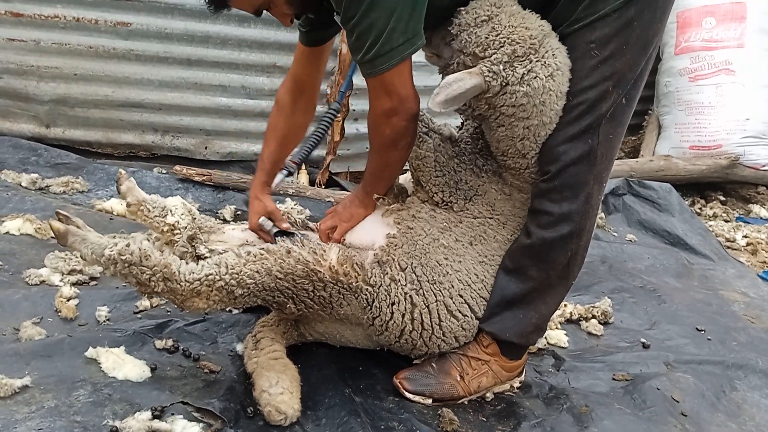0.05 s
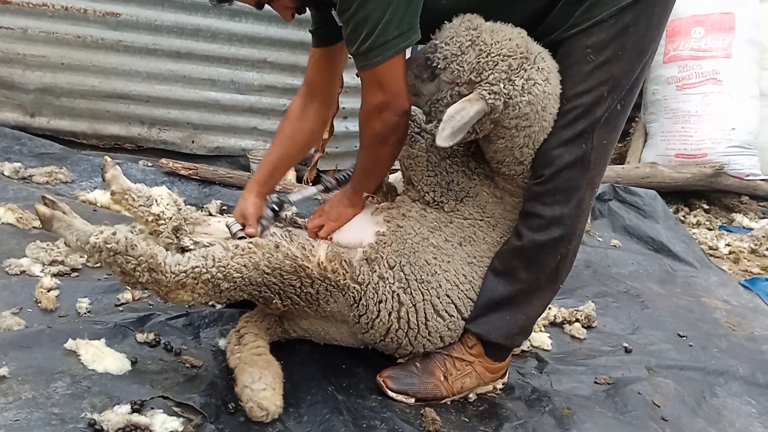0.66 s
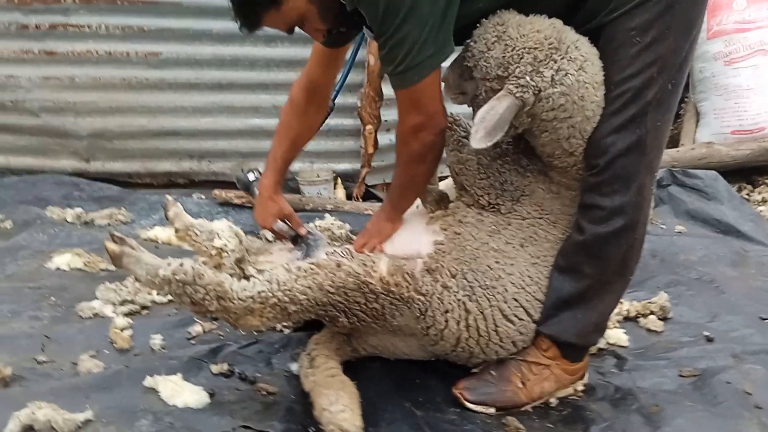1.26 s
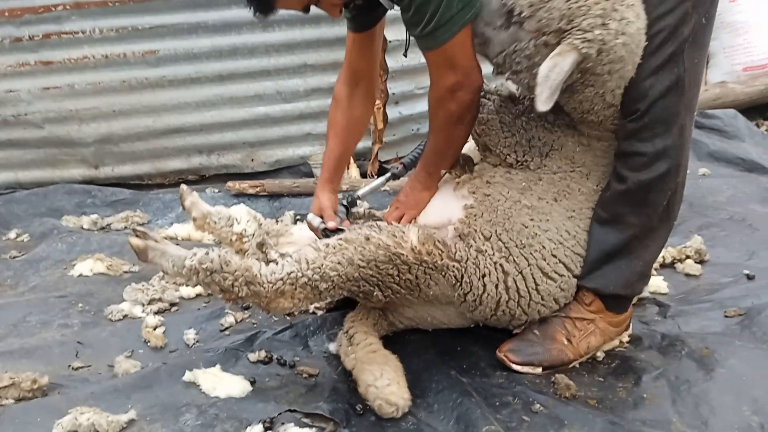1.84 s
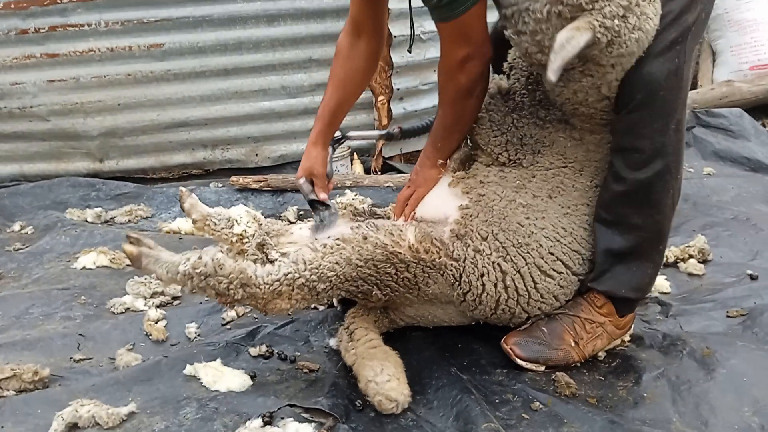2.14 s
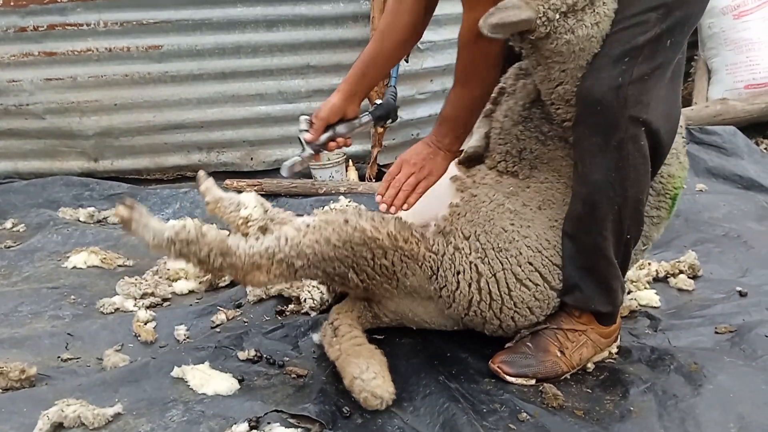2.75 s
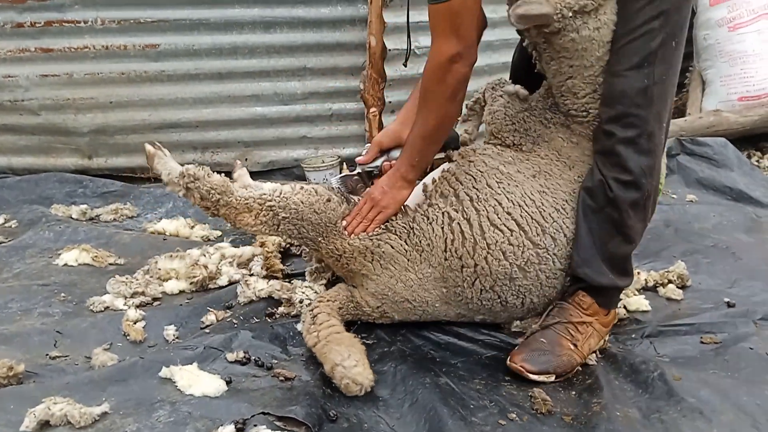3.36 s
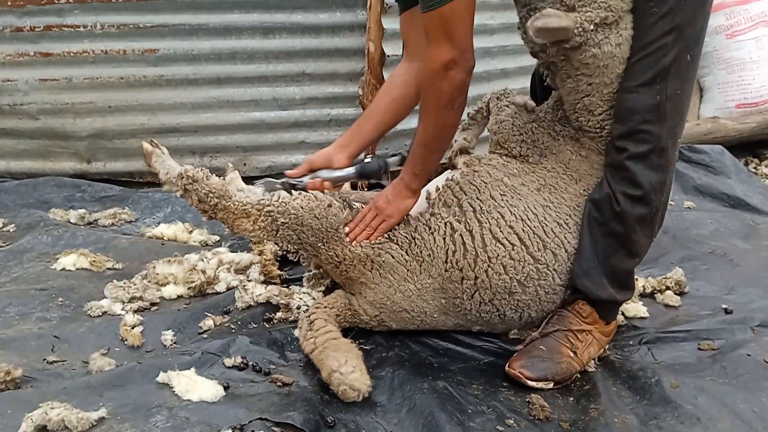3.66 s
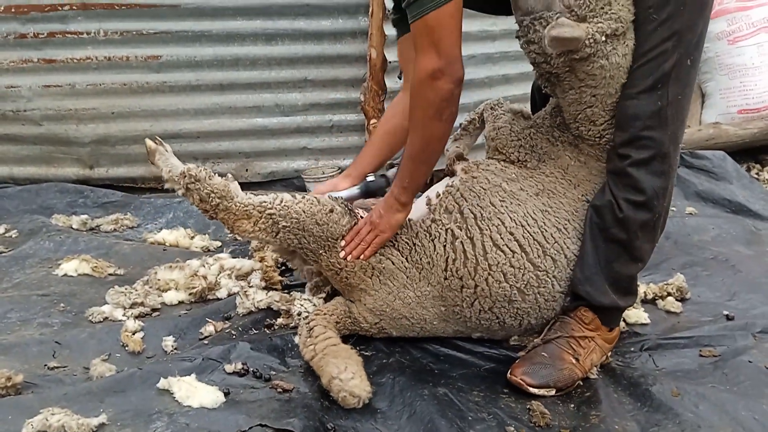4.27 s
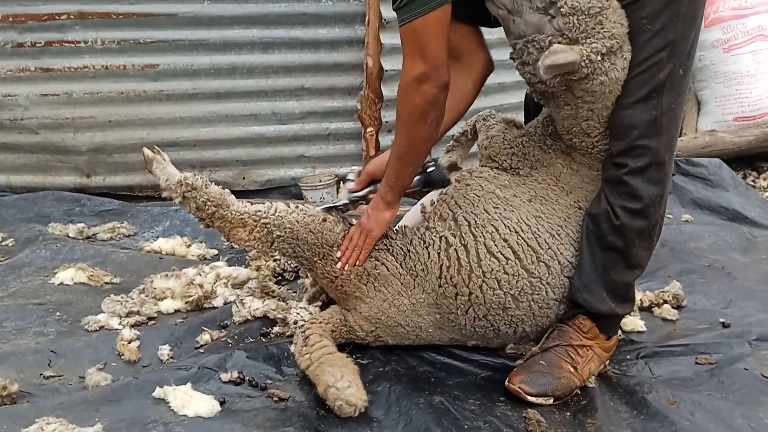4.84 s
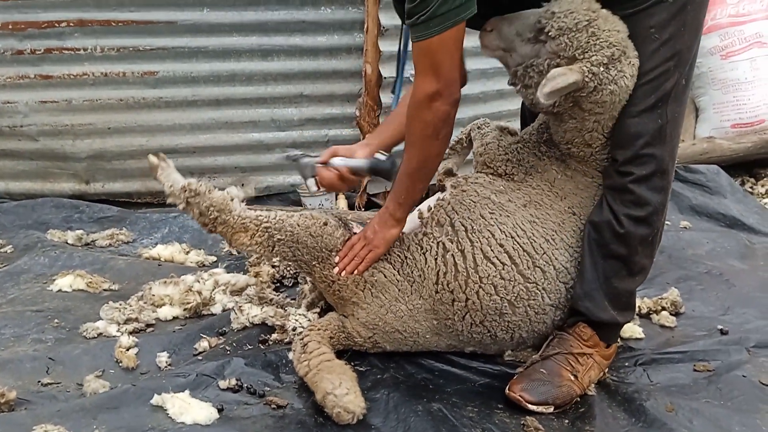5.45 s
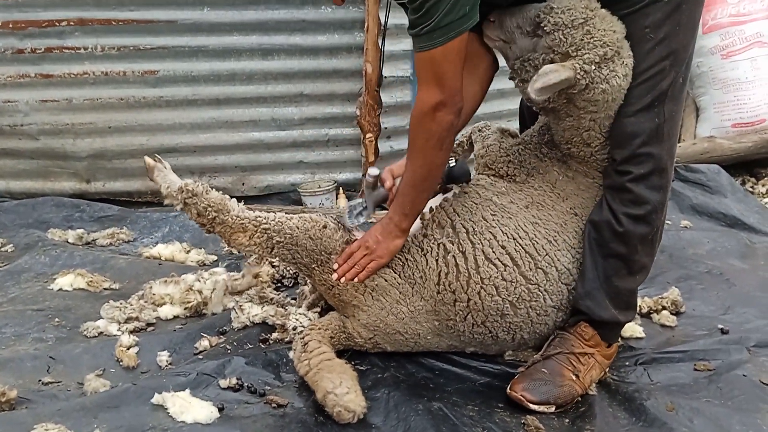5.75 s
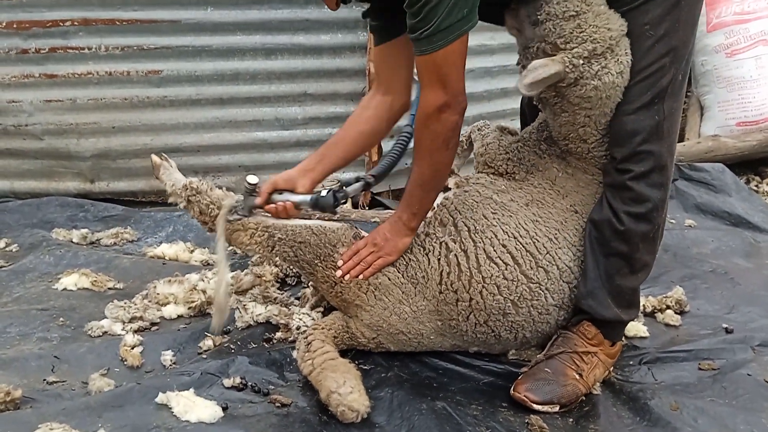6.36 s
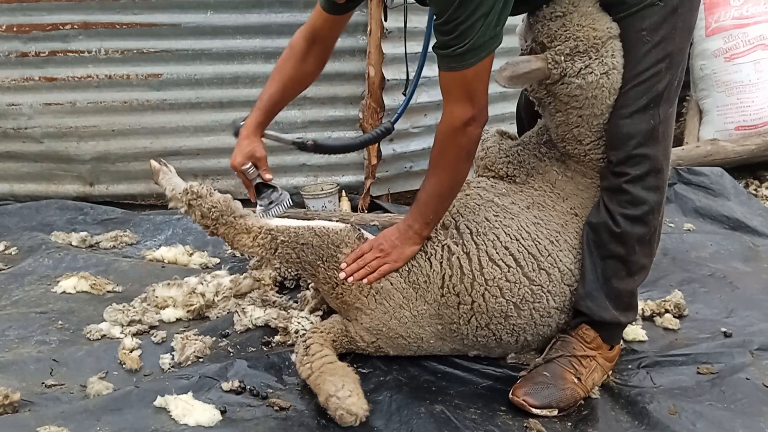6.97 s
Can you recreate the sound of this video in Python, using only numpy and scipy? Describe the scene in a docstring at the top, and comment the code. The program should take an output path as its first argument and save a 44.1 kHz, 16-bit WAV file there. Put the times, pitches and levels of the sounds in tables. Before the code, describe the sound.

A powered shearing handpiece runs without a break as a sheep is shorn. Its blades give a fast, high hiss and rattle over a hollow whirr and the steady throbbing hum of the drive motor. The tone shifts slightly as the tool is pushed and turned, with a few tiny snags midway and brief metallic rattling and ringing near the end. It is heard fairly close, with short reflections from a corrugated iron wall.

```python
"""Sheep shearing

A sheep is shorn on a tarpaulin beside a corrugated iron wall; both return short echoes.
The drive motor throbs at about 26 turns a second. The cutter swings over the comb about twice as
fast, hissing and rattling. Handpiece resonances flare as it is pushed and turned in the wool."""
import sys
import numpy as np
from scipy import signal
from scipy.fft import rfft, irfft
from scipy.io import wavfile

SR = 44100
rng = np.random.default_rng(int(sys.argv[2]) if len(sys.argv) > 2 else 0)


def int16_out(signal):
    """Quantize to a 16-bit WAV file."""
    q = np.round(np.clip(np.atleast_2d(signal).T, -1, 1) * 32767)
    wavfile.write(sys.argv[1], SR, q.astype(np.int16))


N = 313551
TIME_S = np.arange(N) / SR
BIN_HZ = np.maximum(np.arange(N + 1) * SR / (2 * N), 1)

# Ground and wall reflections: delay_s, gain_db
ECHOES = [(.0021, -11), (.0068, -15), (.0113, -17), (.019, -18.5)]
# Motor hum: turn_harmonic, relative_db
MOTOR_HARMONICS = [(1, -27), (2, -9.5), (3, -10), (4, 0), (5, -7.5), (6, -8), (7, -7.5), (8, -13.5),
                   (9, 0.5), (10, 1.5), (11, -7.5), (12, -4.5), (13, -10.5), (14, -9.5), (15, -19),
                   (16, -38), (17, -21), (18, -10.5), (19, -22), (20, -33), (21, -9), (22, -34), (23, -28),
                   (24, -23), (25, -15), (26, -15), (27, -8)]
# Handpiece shaken by the fork: swing_harmonic, rms_db
SHAKE_HARMONICS = [(1, -91), (2, -88), (3, -75), (4, -90), (5, -89.5)]
# Noise spectra of motor, housing and blades: freq_hz, relative_db
THROB_SPECTRUM = [(50, -13), (90, -18), (125, 4.5), (160, 1), (200, 0), (245, 1.5), (310, -1), (400, -8),
                  (800, -42.5)]
HOUSING_SPECTRUM = [(250, -17.5), (400, -10.5), (490, -2), (600, -7), (770, -3.5), (860, -4), (1100, 1),
                    (1500, -2.5), (1850, -2.5), (2800, 1.5), (3400, -3), (4300, -2), (6500, -16.5)]
HISS_SPECTRUM = [(2500, -27.5), (3800, -13.5), (4600, -8.5), (5100, -5), (5600, -0.5), (5850, -0.5),
                 (6150, 3), (6550, 2.5), (7000, -1.5), (7500, -7.5), (8000, -18), (9300, -40),
                 (12000, -48.5)]
SIZZLE_SPECTRUM = [(6500, -22), (8150, -4), (9300, -7), (10600, -4), (12000, -8.5), (13000, -11.5),
                   (13800, -21), (14400, -2), (15000, 1), (15800, -4.5)]
# Housing resonances: pitch_hz, width_hz, gain_db
HOUSING_MODES = [(1659, 69, 1), (2000, 120, -6.5), (2310, 135, -2), (2940, 230, -13.5), (3460, 69, -5),
                 (3950, 74, -5)]
# Handle air resonance, tuned by the grip: time_s, pitch_hz, level_db
GRIP = [(0, 990, -73), (.28, 980, -60), (.55, 930, -66), (.8, 870, -74), (2.15, 865, -83), (2.4, 950, -70),
        (2.8, 883, -70), (3.2, 868, -61.5), (3.9, 865, -74), (4.35, 865, -64), (4.6, 865, -73),
        (4.9, 885, -61), (5.25, 870, -73), (5.75, 1105, -58.5), (5.98, 1120, -62.5), (6.35, 1250, -58.5),
        (6.8, 1070, -62), (7.11, 900, -69)]
# Fork rattles: centre_s, length_s, level_db
FORK_RATTLES = [(5.497, .06, -53), (5.633, .24, -59), (6.25, .4, -58.5), (6.74, .043, -52)]
# Comb ringing clear of the wool: centre_s, length_s, pitch_hz, level_db
COMB_RINGS = [(.993, 0.16, 5140, -54), (2.4, 0.28, 4430, -62), (3.57, .18, 4070, -61),
              (4.85, 0.39, 4130, -63.5), (6.38, 0.21, 5180, -53), (6.612, .09, 4950, -49.5),
              (6.805, .06, 5350, -58.5), (6.9, .06, 5140, -54), (7.05, .12, 5080, -58)]
# Comb depth in the wool, 0-1: time_s, depth
WOOL_DEPTH = [(1.38, 0.1), (1.48, .4), (1.9, 0.3), (2.35, 0.1), (7.11, 0.03)]
# How openly the comb faces the listener: time_s, relative_db
FACING = [(0.0, -58), (0.75, -59.1), (1.35, -57), (1.55, -60), (2.2, -58.5), (3.0, -56), (3.6, -54.5),
          (4.1, -55.0), (4.52, -57), (4.8, -53.1), (5.22, -57.0), (5.45, -52), (5.85, -53.5), (6.1, -56.0),
          (6.35, -55), (6.83, -58.5), (7.11, -55)]
# Pushes into the fleece: centre_s, length_s, hiss_boost_db
PUSHES = [(.25, .22, 1.2), (1.2, 0.35, 0.5), (2.45, 0.39, 2), (3.3, .08, 2.6), (4.01, .06, 2.5),
          (5.48, .06, 3.5), (7.07, 0.064, 1)]
# Teeth snagging: start_s, relative_db
SNAGS = [(1.683, -30), (3.3045, -28), (3.3426, -29.5), (3.636, -33), (3.991, -32), (5.473, -37)]


def from_db(db):
    """Decibels to gain."""
    return 10 ** (np.asarray(db) / 20)


def unit_rms(x):
    """Scale to rms 1."""
    return x / np.sqrt(np.mean(x ** 2) + 1e-20)


def curves(rows):
    """Interpolate each column after time_s per sample."""
    times_s, *columns = np.transpose(rows)
    return [np.interp(TIME_S, times_s, column) for column in columns]


def swell(centre_s, length_s):
    """Rounded rise and fall, peak 1."""
    return np.exp(-np.abs(2 * (TIME_S - centre_s) / length_s) ** 3 / 2)


def drift(rate_hz):
    """Low-passed random wander, rms 1."""
    return unit_rms(irfft(rfft(rng.standard_normal(2 * N)) / (1 + (BIN_HZ / rate_hz) ** 2))[:N])


def cycles(rate_hz, sag_hz_per_s):
    """Cycle count of a steadily slowing drive."""
    return np.cumsum(rate_hz - sag_hz_per_s * TIME_S) / SR


def minimum_phase(log_gain):
    """Causal frequency response with the given log magnitude."""
    cepstrum = irfft(log_gain)
    half = len(cepstrum) // 2
    cepstrum[1:half] *= 2
    cepstrum[half + 1:] = 0
    return np.exp(rfft(cepstrum))


def colour(x, spectrum):
    """Filter by a body's spectrum; rms 1."""
    hz, db = np.transpose(spectrum)
    low_rolloff = np.minimum(BIN_HZ / hz[0], 1)
    gain = from_db(np.interp(np.log(BIN_HZ), np.log(hz), db)) * low_rolloff
    return unit_rms(irfft(rfft(x, 2 * N) * minimum_phase(np.log(gain)))[:N])


def resonate(x, hz, width_hz):
    """Two-pole resonance, peak gain 1."""
    radius = np.exp(-np.pi * width_hz / SR)
    feedback = [1, -2 * radius * np.cos(2 * np.pi * hz / SR), radius ** 2]
    return signal.lfilter(np.array([1, 0, -1]) * (1 - radius ** 2) / 2, feedback, x)


def glide(x, hz, width_hz):
    """Resonance with a moving centre; rms 1."""
    carrier = np.exp(2j * np.pi * np.cumsum(hz) / SR)
    radius = np.exp(-np.pi * width_hz / SR)
    baseband = signal.lfilter([1], [1, -2 * radius, radius ** 2], x / carrier)
    return unit_rms(np.real(carrier * baseband))


def ring(x, hz, width_hz):
    """The same resonance twice in series; rms 1."""
    return unit_rms(resonate(resonate(x, hz, width_hz), hz, width_hz))


def bursts(phase, fade_cycles, spread_db):
    """One decaying noise puff per cycle, uneven in strength; rms 1."""
    strengths = from_db(spread_db * np.clip(rng.standard_normal(4096), -2, 2))
    envelope = strengths[phase.astype(int) % len(strengths)] * np.exp(-(phase % 1) / fade_cycles)
    return unit_rms(envelope * rng.standard_normal(N))


def grains(per_s, spread_db):
    """Random clicks of uneven size; rms 1."""
    clicks = (rng.random(N) < per_s / SR) * rng.choice([-1, 1], N)
    return unit_rms(clicks * from_db(spread_db * np.minimum(rng.exponential(1, N), 4)))


def add_echoes(x, sway_s):
    """Ground and wall reflect along paths that shift as the hand moves."""
    return x + sum(from_db(db) * np.interp(TIME_S - delay_s - sway_s * drift(0.55), TIME_S, x)
                   for delay_s, db in ECHOES)


def motor(turns, hum_db, throb_db):
    """Each turn gives a knock with a rough puff, then a lower thud 0.3 turn later."""
    orders, db = np.transpose(MOTOR_HARMONICS)
    response = minimum_phase(np.log(from_db(np.r_[db[0], db, db[-1]])))[1:-1]
    strike_turns = np.where(orders < 8, 0.8, 0.5)
    hum = np.zeros(N)
    for order, gain, strike in zip(orders, response, strike_turns):
        phase_rad = 2 * np.pi * order * (turns - strike) + np.angle(gain)
        hum += abs(gain) * from_db(1.4 * drift(4)) * np.cos(phase_rad)
    throb = colour(bursts(turns + 0.5, fade_cycles=0.7, spread_db=2), THROB_SPECTRUM)
    return from_db(hum_db) * unit_rms(hum) + from_db(throb_db) * throb


def fork_shake(swings):
    """The fork shakes the handpiece just below the motor's even harmonics, so the two beat."""
    return sum(from_db(db) * np.sqrt(2) * np.cos(2 * np.pi * order * swings)
               for order, db in SHAKE_HARMONICS)


def handle_air(rubbing, closed_hz, open_hz):
    """Air in the handle rings higher and broader as the hand opens."""
    pitch_hz, level_db = curves(GRIP)
    openness = np.clip((pitch_hz - closed_hz) / (open_hz - closed_hz), 0, 1)
    narrow = glide(rubbing, pitch_hz, width_hz=160)
    broad = glide(rng.standard_normal(N), pitch_hz, width_hz=590)
    return from_db(level_db) * (np.sqrt(1 - openness) * narrow + np.sqrt(openness) * broad)


def fork_rattle(rubbing):
    """The fork rattles as the handpiece is lifted and turned."""
    envelope = sum(from_db(db) * swell(centre_s, length_s) for centre_s, length_s, db in FORK_RATTLES)
    return envelope * ring(rubbing, hz=2330, width_hz=250)


def comb_ring(rubbing):
    """Free teeth ring briefly, pitched by how far they stand out of the wool."""
    return sum(from_db(db) * swell(centre_s, length_s) * ring(rubbing, hz, width_hz=660)
               for centre_s, length_s, hz, db in COMB_RINGS)


def housing(swings, level_db):
    """Crank and bearings whirr in the hollow handle, knocked at both ends of the swing."""
    swing_knocks = bursts(swings, fade_cycles=0.4, spread_db=2.5)
    end_knocks = bursts(2 * swings, fade_cycles=0.2, spread_db=2)
    force = rng.standard_normal(N) + 0.5 * (swing_knocks + 0.45 * end_knocks)
    whirr = colour(force, HOUSING_SPECTRUM)
    modes = sum(from_db(db) * resonate(whirr, hz, width_hz) for hz, width_hz, db in HOUSING_MODES)
    handle = from_db(2.5) * resonate(whirr, hz=865, width_hz=37)
    return from_db(level_db) * unit_rms(whirr + modes + handle)


def damping(x, wool_depth):
    """Grip and wool damp and free resonances at random; deep wool absorbs the upper mids."""
    centres_hz = np.geomspace(1105, 7530, 20)
    shifted = x + 0.15 * sum(drift(8.5) * resonate(x, hz, hz / 14) for hz in centres_hz)
    return shifted - wool_depth * resonate(shifted, hz=3750, width_hz=1400)


def snags(fade_s, gain_db):
    """Catching teeth give brief, harder scrapes."""
    envelope = sum(from_db(db) * (TIME_S >= start_s) * np.exp(-np.abs(TIME_S - start_s) / fade_s)
                   for start_s, db in SNAGS)
    return from_db(gain_db) * envelope * colour(rng.standard_normal(N), HISS_SPECTRUM)


def blades(swings, rubbing, hiss_db, sizzle_db, slap_share):
    """Steel rubs and slaps on steel once a swing; the fork chatters four times as fast; fibres snap."""
    wool_feed = from_db(0.8 * drift(120))
    slaps = bursts(swings, fade_cycles=0.25, spread_db=3)
    chatter = bursts(4 * swings, fade_cycles=0.25, spread_db=3)
    knocks = unit_rms(0.71 * slaps + chatter)
    pressure = 1 + 0.4 * slap_share * np.cos(2 * np.pi * (swings - 0.15))
    force = np.sqrt(slap_share) * knocks + np.sqrt(1 - slap_share) * rubbing * wool_feed * pressure
    snaps = grains(per_s=1500, spread_db=9)
    hiss = from_db(hiss_db) * colour(force, HISS_SPECTRUM)
    sizzle = from_db(sizzle_db) * colour(force + 0.36 * snaps, SIZZLE_SPECTRUM)
    return hiss + sizzle


def scene():
    """Handpiece in the wool, motor behind it; mono."""
    turns = cycles(rate_hz=25.925, sag_hz_per_s=0.018) + 0.004 * drift(4)
    swings = cycles(rate_hz=51.15, sag_hz_per_s=0.025) + 0.18 + 0.012 * drift(8)
    wool_depth, = curves(WOOL_DEPTH)
    facing_db, = curves(FACING)
    facing_db -= facing_db.mean()
    push_db = sum(db * swell(centre_s, length_s) for centre_s, length_s, db in PUSHES)
    push_db += 0.25 * drift(9)  # unsteady hand
    rubbing = unit_rms(rng.standard_normal(N) + 0.5 * grains(per_s=3000, spread_db=4.5))
    cutting = blades(swings, rubbing, hiss_db=-47 + 0.67 * facing_db + push_db,
                     sizzle_db=-54 + facing_db, slap_share=0.25)
    cutting += snags(fade_s=0.0026, gain_db=-8.5)
    whirr = housing(swings, level_db=-53 + 0.2 * facing_db + 0.28 * push_db - 5 * wool_depth)
    rasp = damping(cutting + whirr, wool_depth)
    rings = handle_air(rubbing, closed_hz=950, open_hz=1260) + fork_rattle(rubbing) + comb_ring(rubbing)
    hum = motor(turns, hum_db=-63.5, throb_db=-68.5) + fork_shake(swings)
    handpiece = from_db(-0.57) * add_echoes(rasp + rings, sway_s=0.000172)
    return (hum + handpiece)[None]


def record(dry):
    """Steep elliptic low-pass."""
    cutoff_hz = 15750
    return signal.sosfilt(signal.ellip(12, 0.1, 70, cutoff_hz, fs=SR, output="sos"), dry)


dry = scene()
out = record(dry)
int16_out(out)
```